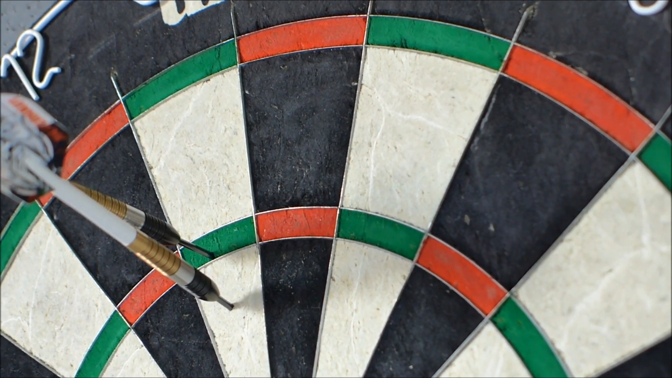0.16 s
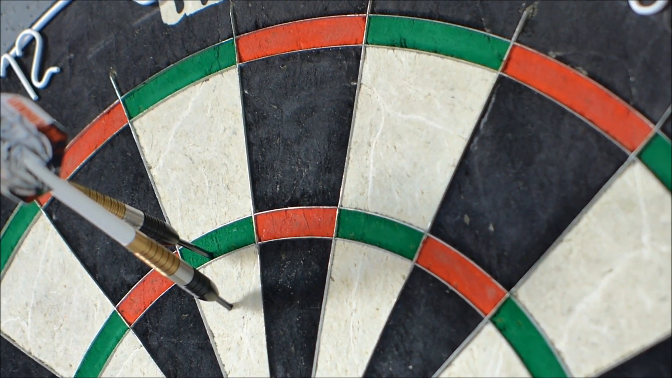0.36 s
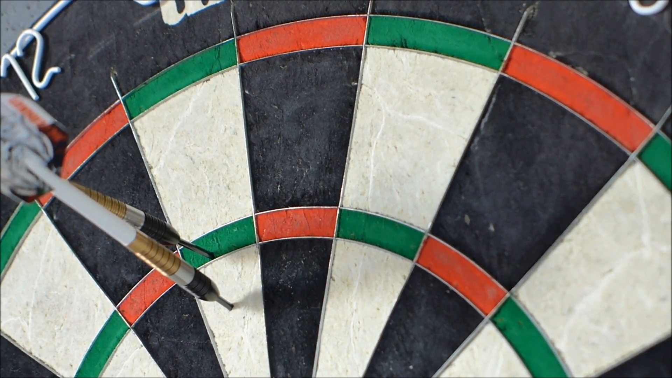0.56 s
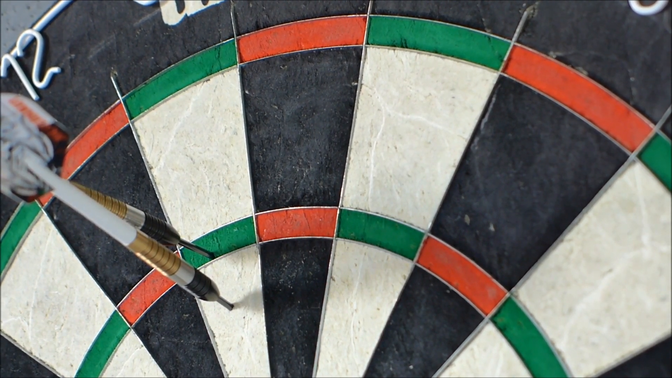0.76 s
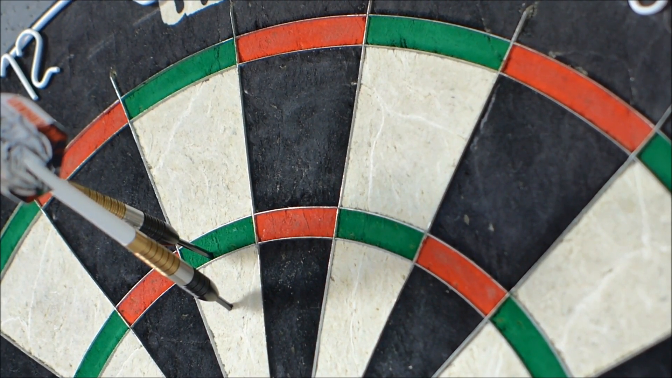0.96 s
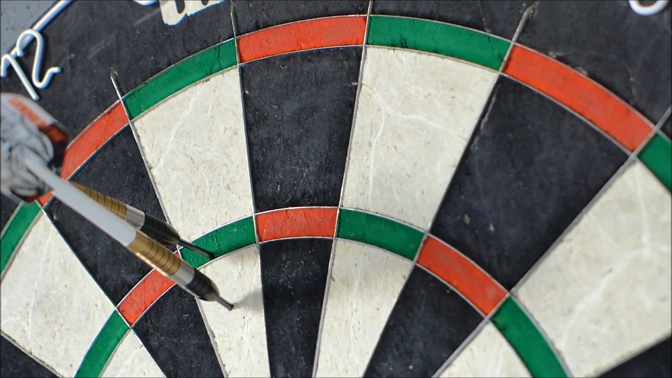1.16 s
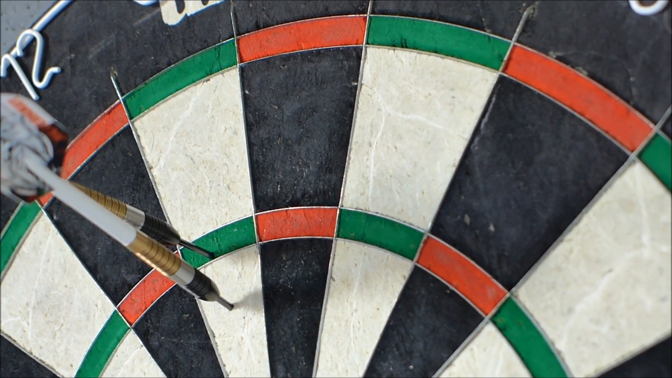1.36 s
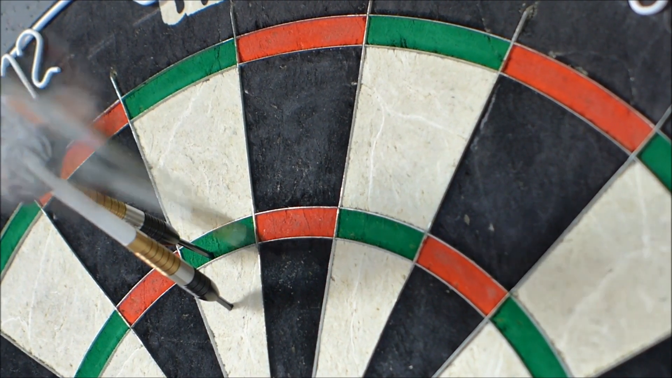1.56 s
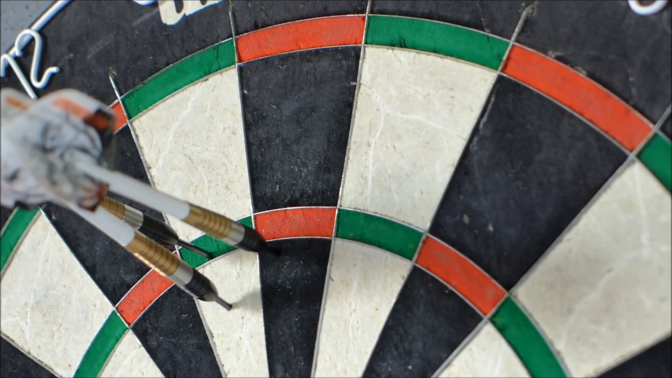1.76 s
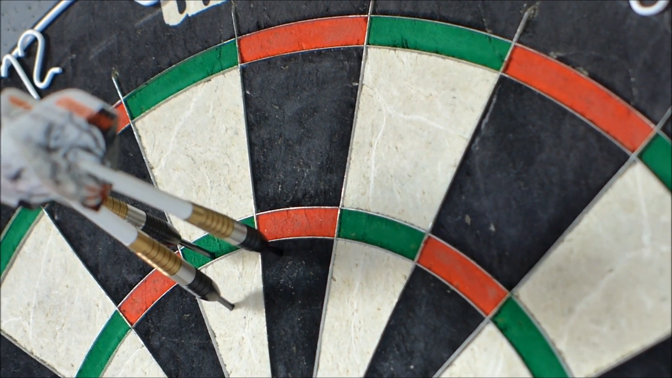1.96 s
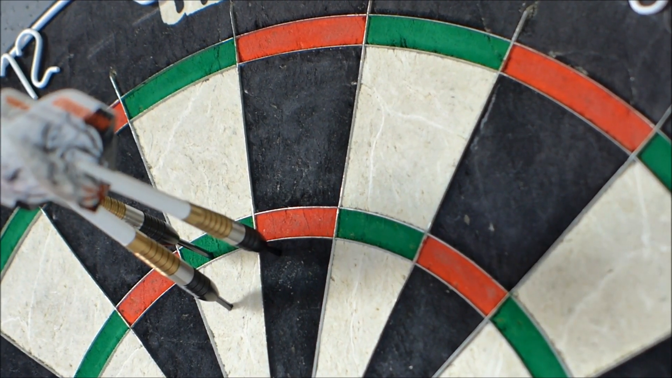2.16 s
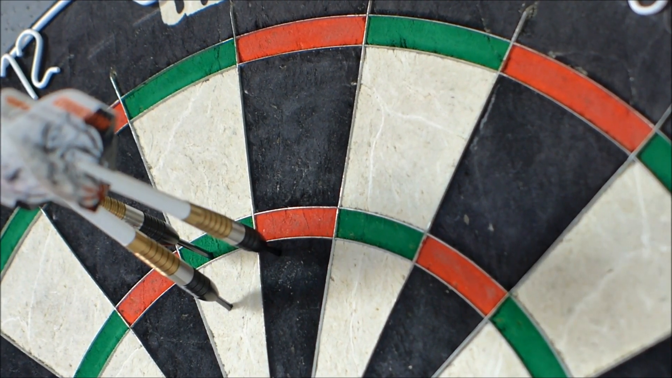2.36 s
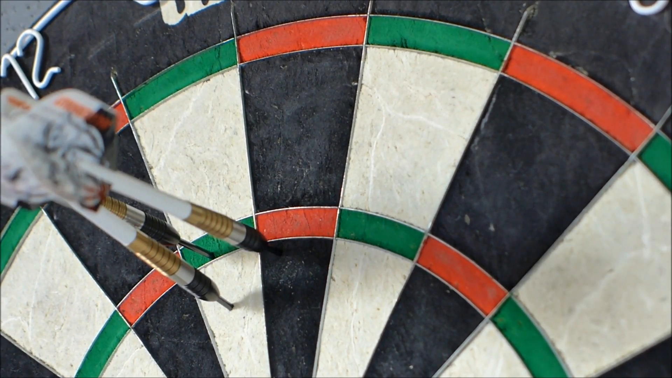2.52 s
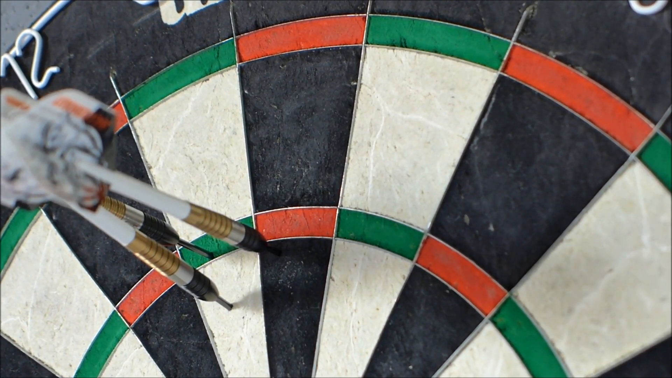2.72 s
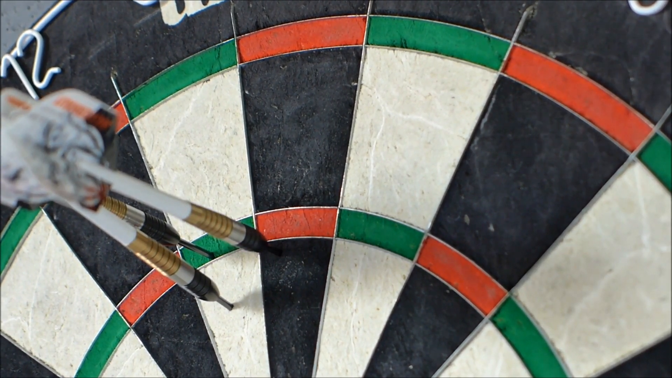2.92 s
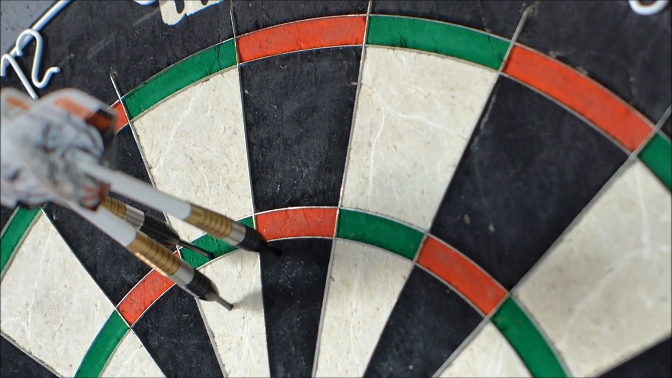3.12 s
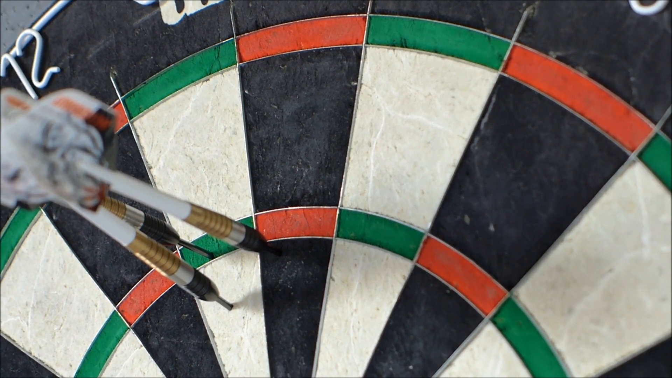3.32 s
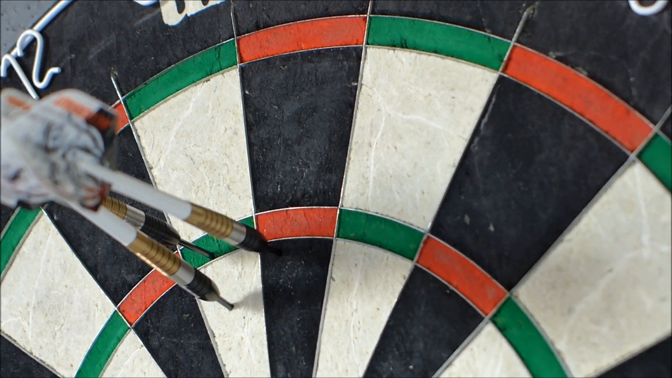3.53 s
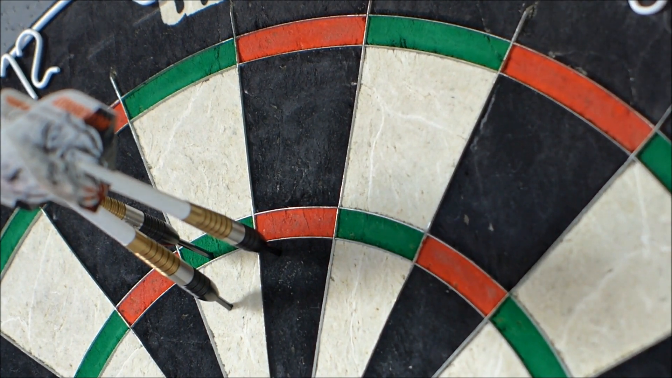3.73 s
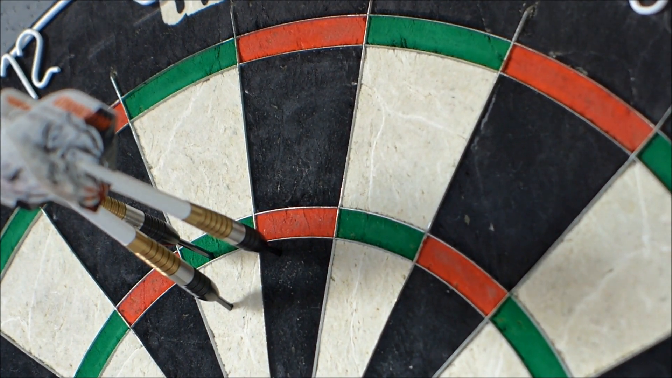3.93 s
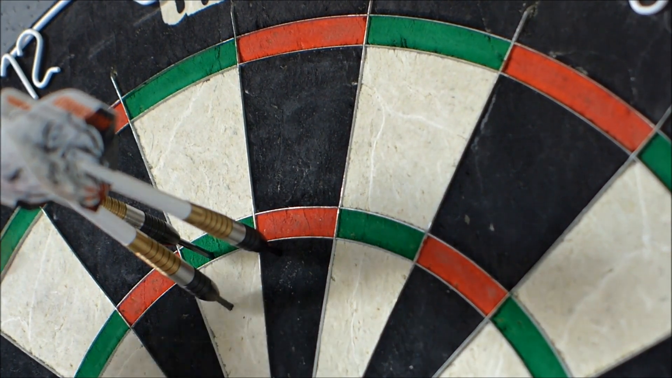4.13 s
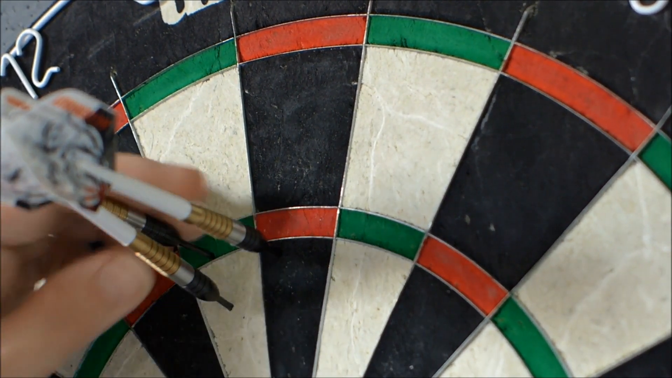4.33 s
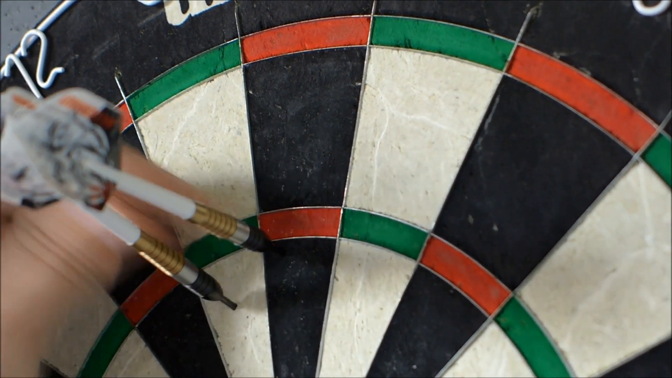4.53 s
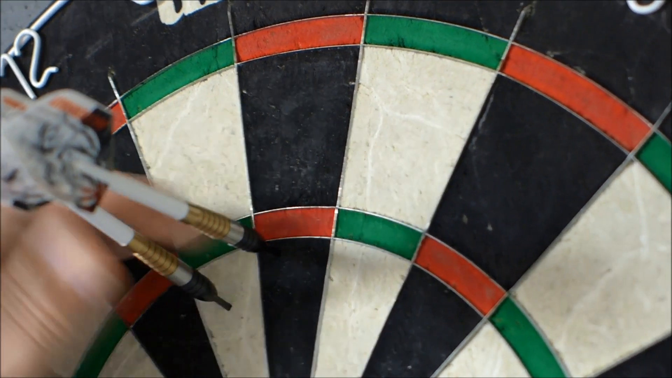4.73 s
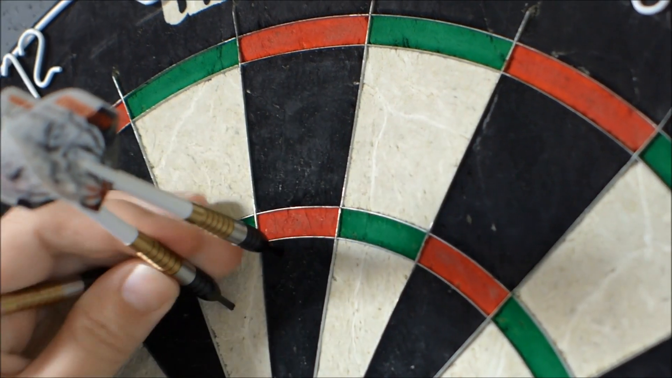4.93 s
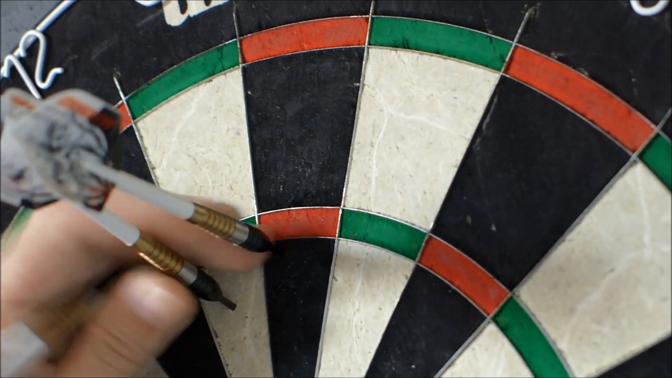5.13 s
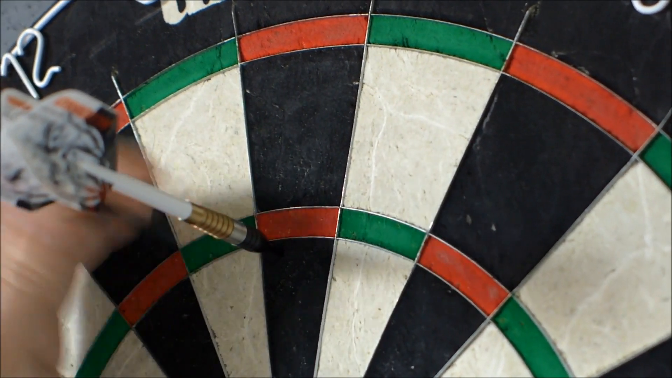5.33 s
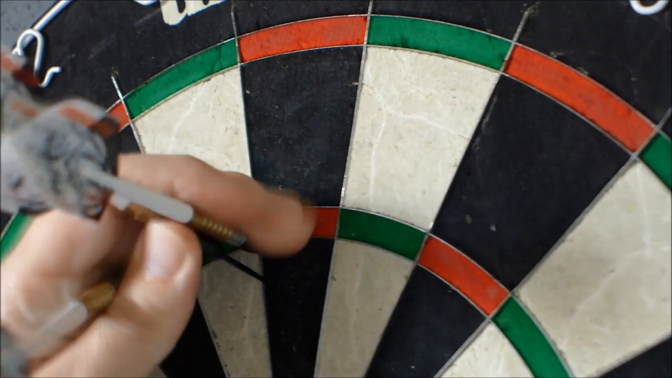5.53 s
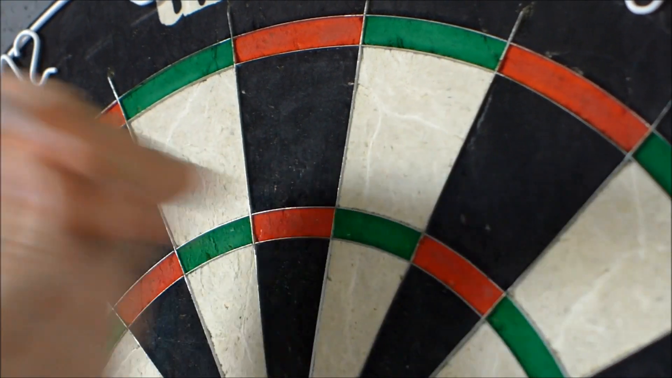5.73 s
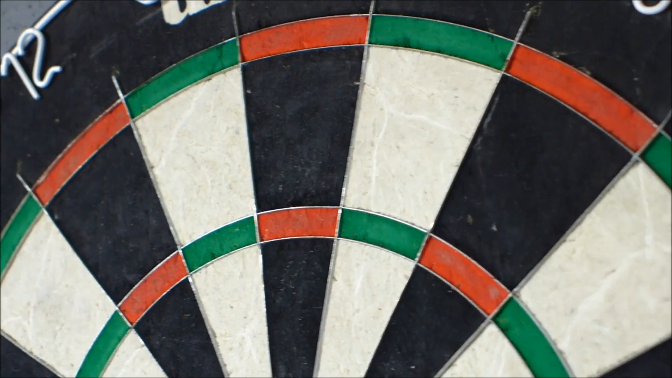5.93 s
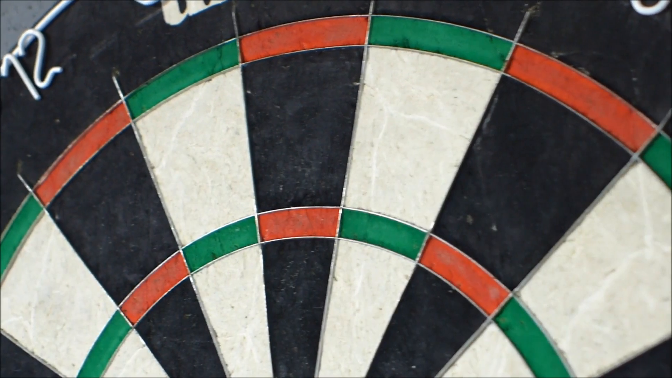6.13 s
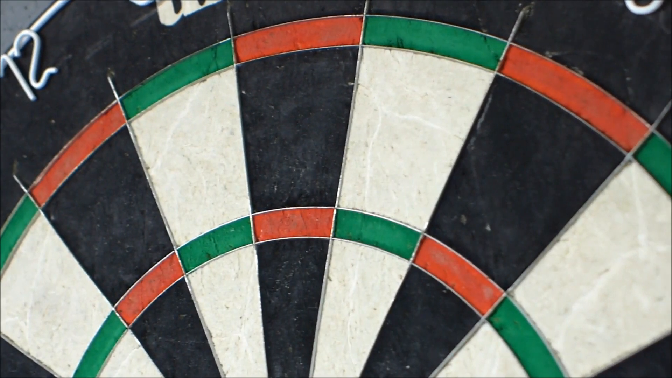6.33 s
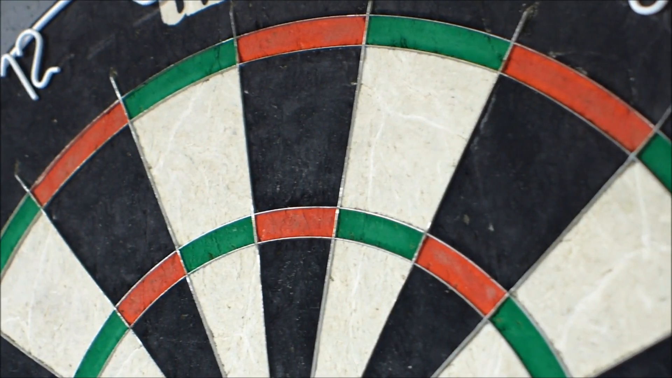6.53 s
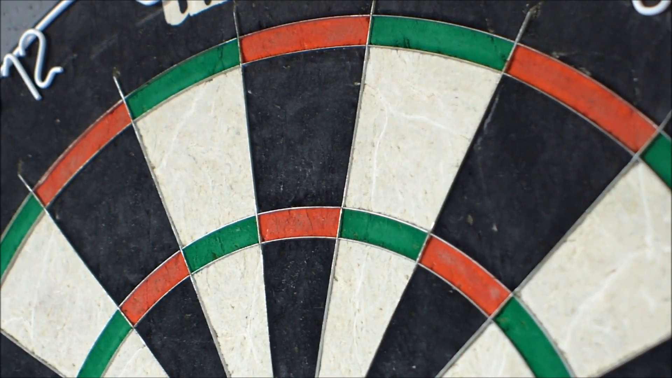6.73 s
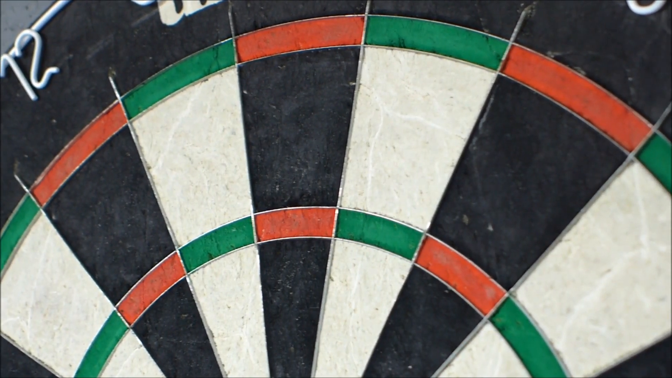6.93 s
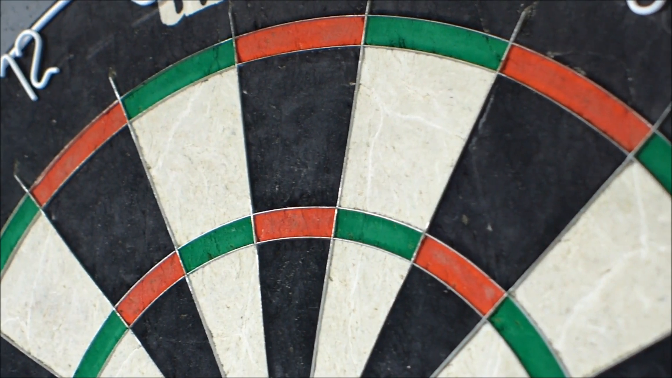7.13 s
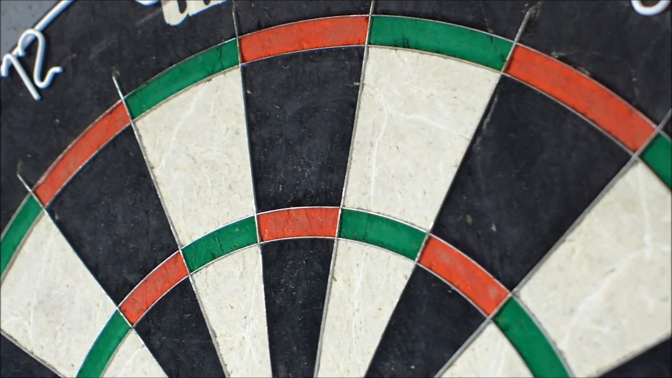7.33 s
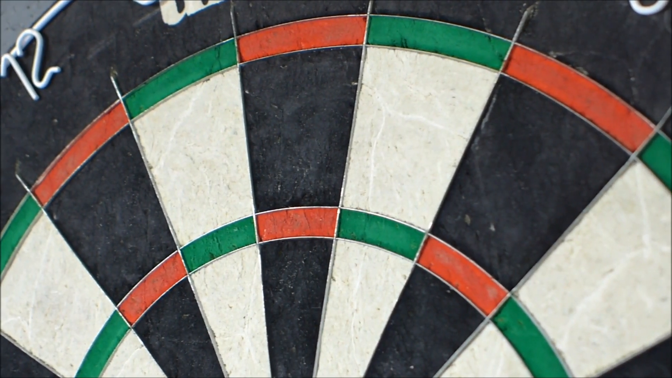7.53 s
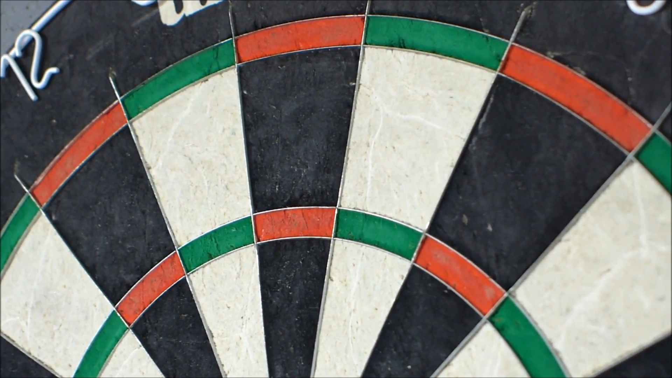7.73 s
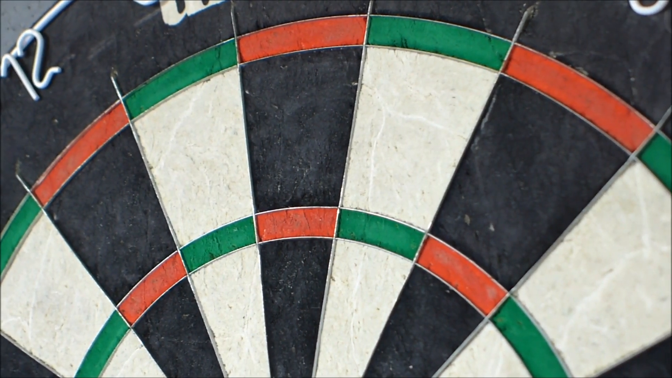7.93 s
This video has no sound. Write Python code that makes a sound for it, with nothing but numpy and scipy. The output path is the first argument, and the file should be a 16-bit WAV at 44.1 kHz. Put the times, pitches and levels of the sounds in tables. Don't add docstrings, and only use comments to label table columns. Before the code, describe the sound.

A quiet small room, faint low hum and soft microphone hiss, with a tiny rustle and shoe touch near 1.2 seconds. At about 1.66 a dart strikes close by: a bright steel tick, at once a heavy, short woody thump of the board on the wall, and a rattle fading within a tenth of a second. Footsteps approach over a hard floor, with a clear heel knock at 2.5, softer ones around 3.3, and a hard shoe edge at 3.9, with light cloth rustle. From 4.5 to 5.4 fingers handle the darts with small metal clicks and dull knocks. Between 5.55 and 5.8 the darts are pulled free in a dense burst of scrapes, snaps and plastic clatter. Steps walk away from 6.1, hollow and roomy, strongest near 6.4, 6.9 and 7.8, over slightly raised hiss. The echoes are short and dry.

```python
import sys
import numpy as np
from scipy import signal
from scipy.fft import rfft, irfft, next_fast_len
from scipy.io import wavfile
from scipy.ndimage import uniform_filter1d, map_coordinates

SR = 44100
rng = np.random.default_rng(int(sys.argv[2]) if len(sys.argv) > 2 else 0)


def persist_wave(psi):
    counts = np.round(np.clip(psi, -1, 1) * 32767).astype(np.int16)
    wavfile.write(sys.argv[1], SR, np.atleast_2d(counts).T)


def field_ratio(decibels):
    return 10 ** (np.asarray(decibels, dtype=float) / 20)


N = 351477
SPAN = 12288
HZ = np.fft.rfftfreq(SPAN, 1 / SR)
FLOOR_WET_DB, HAND_WET_DB = 2.0, 1

# f/Hz, density/dB
HUM_SPECTRUM = [(12, -42), (20, -17), (32, -35.5), (123, -23), (148, -28.5), (167, -16), (240, -17),
                (359, -21), (414, -19.5), (561, -19.5), (659, -20.5), (744, -22.5), (823, -21), (1110, -22),
                (2500, -33.5), (3250, -52), (5500, -120)]
HISS_SPECTRUM = [(880, -9.5), (1500, 4), (2160, -4.5), (2250, -6.5), (2610, -4.5), (3830, -7.5), (4190, -4),
                 (5690, -4.5), (10300, -7.5), (13700, -11.5), (15900, -19.5)]
# t/s, level over the still room/dB
STIR = [(0, 0), (1.5, 2), (2.6, 2.5), (3.6, 3), (4.7, 3.5), (5.3, 4), (5.7, 6.5), (6, 3.5), (7, 5.5),
        (7.6, 3.5), (7.97, 6.5)]
# f/Hz, likeness
AIR_LIKENESS = [(60, 0.83), (180, 0.82), (550, -0.47), (1650, -0.73), (4970, 0.3), (15000, 0.57)]
# f/Hz, likeness
ECHO_LIKENESS = [(100, 0.96), (400, 1), (1000, 0.77), (3000, 0.67), (10000, 0.2)]
# f/Hz, T60/s
ROOM_DECAY = [(100, 0.33), (500, 0.19), (2000, 0.22), (6000, 0.21), (14000, 0.21)]

# t of peak/s, level/dB,
# swell/(dB/s), fade/(dB/s)
SLEEVE_RUSTLES = [(1.212, -62.5, 399, 178), (5.936, -58.5, 120, 217.5), (6.555, -59, 599, 260),
                  (7.942, -61.5, 600, 200), (1.6565, -47.5, 3001.5, 4002), (5.7205, -48, 1200, 3000)]
# t of peak/s, level/dB, swell/(dB/s), fade/(dB/s)
STRIDE_RUSTLES = [(2.05, -80, 150, 100.6), (2.38, -72.5, 100, 100), (2.71, -71, 300, 39.8),
                  (3.1, -81, 40.2, 40.2), (3.55, -70, 30, 40), (5.44, -64, 300, 600), (5.99, -80, 60, 200),
                  (6.4, -67, 100, 150), (6.56, -72, 400, 200), (7.16, -65.5, 500, 75)]
# f/Hz, density/dB
WEAVE_SPECTRUM = [(1760, -40), (3000, -17), (4200, -15), (5000, -2.5), (6090, -15.5), (9000, -16),
                  (14000, -31), (16000, -40)]
SMOOTH_SPECTRUM = [(1500, -29), (3500, -17), (5000, -7.5), (8000, -10.5), (12000, -12.5), (16000, -27)]

# f/Hz, density/dB
FLOOR_SPECTRUM = [(35, -46), (60, -34.5), (156, -9.5), (370, -6), (576, -3.5), (980, -4), (1140, -7),
                  (2600, -12.5), (3470, -15.5), (4050, -11.5), (12000, -31), (15600, -59), (22000, -120)]
# t/s, level/dB, hardness/dB, hollow note f/Hz
TOES = [(1.277, -43, -7, 830), (2.645, -48, -9, 1100), (6.2465, -38.5, -21, 970), (3.918, -45, -7, 2100),
        (7.766, -29.5, -7.5, 560), (7.772, -37, 1, 1100), (2.493, -31, -10, 1060)]
# t/s, level/dB, hardness/dB, hollow note f/Hz
SOLES = [(1.977, -44.5, -13.5, 570), (2.564, -46.5, -11, 456), (3.2345, -42.5, -19, 760),
         (3.33, -33, -15.5, 440), (6.3255, -36.5, -12, 519), (6.355, -34, -4, 705), (6.396, -29, -6, 550),
         (6.414, -48, -11, 571), (6.906, -39, -10, 516), (6.92, -22, -12, 556), (6.991, -35, -18, 530),
         (7.132, -42.5, -14, 560), (7.152, -38, -10, 710), (7.2, -50, -6, 800), (7.937, -30.5, -24.5, 615)]
# t/s, level/dB, hardness/dB, hollow note f/Hz
HEELS = [(2.175, -52, -1, 568), (2.485, -25, -5, 640), (2.658, -39.5, -14, 664), (2.684, -41.5, -14, 465),
         (3.359, -47.5, 0, 735), (3.388, -40.5, -4.5, 523), (4.075, -39, -13.5, 925), (4.127, -49, -2, 450),
         (4.196, -50.5, -9, 460), (6.694, -42.5, -27, 526), (6.842, -39.5, -9, 563), (7.262, -44, -10, 690)]
# t/s, level/dB, hardness/dB, hollow note f/Hz
CREAKS = [
    (2.471, -50, 8, 395),
    (6.124, -47.5, -17.5, 680),
]
# t/s, level/dB, hardness/dB, hollow note f/Hz, contact/s
KNOCKS = [
    (3.933, -26.5, 1, 503, 0.0024),
    (4.569, -47, -5, 400, 0.003),
    (4.884, -34, -25, 680, 0.0037),
    (5.0764, -37.5, 1.5, 750, 0.0047),
    (5.336, -30, 8, 430, 0.0014),
    (5.382, -41.5, -3, 520, 0.0056),
    (5.716, -36, 1, 560, 0.0088),
]
# t/s, level/dB, hardness/dB, hollow note f/Hz, contact/s
RAPS = [(5.2279, -31.5, -17, 780, 0.00084), (5.304, -43, -9, 468, 0.0029), (5.552, -25.5, -4, 840, 0.0033),
        (5.566, -26, -7, 810, 0.0068), (5.623, -30, -7, 1140, 0.0031), (5.775, -34, 5, 614, 0.0021),
        (5.858, -42, 5, 1270, 0.0051), (6.924, -25.5, -10.5, 1000, 0.005)]

# t/s, level/dB
POINT_MODES = [(1790, -5, 0.015), (2760, -16, 0.018), (4510, -7, 0.022), (5740, -9, .02), (6870, -1, 0.014),
               (9200, -9, .011), (10700, -8, 0.016)]
POINT_HITS = [
    (1.6567, -13),
    (1.692, -24),
]
# t/s, level/dB
FACE_MODES = [(216, -8, 0.18), (324, -1, 0.19), (410, -8, 0.18), (473, -3, 0.26), (560, -5, 0.16),
              (633, -6, 0.25), (740, -8.5, 0.17), (915, -3, 0.17)]
FACE_HITS = [
    (1.682, -25),
]
# t/s, level/dB
WIRE_MODES = [(1047, 0, .1), (1340, -2, .03), (1755, -9, .06), (2115, -12, .07), (2420, -15, .07)]
WIRE_HITS = [
    (1.678, -29),
    (1.706, -37),
]
# t/s, level/dB
LANDING_MODES = [(820, 0, .07), (1284, -7.5, 0.12), (1628, -13, 0.13), (1820, -12.5, 0.099),
                 (2180, -11.5, .08), (2830, -18, 0.09)]
LANDING_HITS = [(2.495, -37), (2.556, -50), (2.657, -52), (3.233, -53.5), (4.884, -50), (6.2465, -50.5)]
# t/s, level/dB
EDGE_MODES = [(726, -4, 0.072), (1627, -3, 0.082), (2190, -2, 0.027), (3080, -1, .025), (3920, 0, .025)]
EDGE_HITS = [(3.9355, -37.5), (6.4, -48), (6.945, -49), (6.375, -50)]
# t/s, level/dB
RIM_MODES = [(554, -9.5, 0.17), (840, 0.5, 0.063), (1260, -11, .1), (1693, -10, .078)]
RIM_HITS = [
    (5.552, -28.5),
]

# t/s, level/dB, contact/s
THUMPS = [
    (1.657, -30.5, 0.00044),
    (1.67, -31, .0004),
    (1.6771, -6.5, 0.0004),
    (1.6814, -9, 0.00089),
    (1.692, -18, 0.00043),
    (1.706, -24.5, 0.00045),
]
# f/Hz, width/Hz, level/dB
BOARD_MODES = [(115.6, 50, -12.5), (210, 120, -14), (310, 130, 1), (450, 260, 4), (735, 330, 5),
               (1310, 570, -5)]

# f/Hz, density/dB
DART_SPECTRUM = [(530, -19), (900, -20.5), (1150, -5), (1390, -6.5), (2020, 3), (2600, -6.5), (3150, -12.5),
                 (3700, -7.5), (4680, -5), (5410, -9.5), (9090, -13.5), (13200, -22.5), (14400, -23),
                 (15400, -29.5), (16000, -60)]
# f/Hz, width/Hz, level/dB
BARREL_MODES = [(1900, 122, -4), (2200, 84, -6), (4000, 84, 5), (4960, 91, -23), (5730, 280, 0),
                (7260, 250, 10)]
# t/s, level/dB, top share/dB, left-right/dB
POINT_SNAPS = [
    (1.6574, -6.5, 1, 3.5),
    (1.6597, -13, -11.5, -6.5),
    (5.6145, -28, -4, 6),
]
# t/s, level/dB, top share/dB, left-right/dB
RATTLES = [(1.6695, -21, -11, -5), (1.6855, -29.5, -21, -3), (1.6915, -16, 7, -5), (1.7024, -27.5, -14, -5),
           (1.7161, -24, -8, -2), (1.7355, -48, -7, -6), (1.7553, -33.5, -7.5, -3)]
# t/s, level/dB, top share/dB, left-right/dB
CLICKS = [(2.387, -54, -1.5, -0.5), (3.3293, -45.5, -7.5, -.5), (3.627, -47.5, 1.5, 0),
          (4.566, -42.5, -6, -3), (4.637, -45, -5.5, -3.5), (4.8799, -35.5, 10.5, 1.5),
          (4.8844, -42.5, -34, -7), (4.9611, -39, 7, -1), (5.0674, -40.5, -11, -3), (5.0771, -27, -7.5, -5),
          (5.1944, -43.5, -6, -.5), (5.3314, -44, -8, -6), (5.3394, -25, -11.5, -12), (5.7365, -27, 4, 3),
          (5.8018, -31.5, -1, 5), (5.9873, -37, 3, 5), (6.215, -45.5, 10, -6), (6.3555, -45, -14, -7),
          (6.4153, -38, -11, -6)]
# t/s, level/dB, top share/dB, left-right/dB
SHAFTS = [(2.696, -46, -25, 5), (5.227, -41.5, -23, 0), (5.456, -41.5, -29, .5), (5.7807, -25.5, -25, 0),
          (5.9305, -38, -23, 5), (5.954, -40, -21, 5)]
# t/s, level/dB, top share/dB, left-right/dB
TAPS = [
    (3.9324, -25, -65, -8),
    (5.8647, -48.5, -18, -1),
]
# t/s, level/dB, barrel share/dB, top share/dB, contact/s
PULLS = [(5.5526, -28, -52, -22, 0.0022), (5.615, -23.5, -1, 0, 0.0025), (5.6235, -11, -11, -5, 0.0017),
         (5.6338, -23.5, -24, -16, 0.01), (5.713, -18.5, -9, -5, 0.0058), (5.7218, -16, -15, -14, 0.0014)]
# t/s, level/dB, barrel share/dB, top share/dB, contact/s
TICKS = [(1.6728, -25, -16, -2, .0008), (1.6905, -17, -16, 8, .0002), (1.7153, -30, -12, 4, .0003),
         (5.6141, -16, -12, 2, .0002), (5.6219, -15, -14, 5, .0002), (5.6272, -13, -6.5, -7.5, .0012),
         (5.7283, -18, -9, -3, 0.0016), (5.7352, -19, -12, 8, .0002), (5.787, -41, -18, 3, .001),
         (5.793, -45, -14, 0, .0012), (5.801, -23, -12, 8, 0.00018), (3.937, -33, 8, -25, .001),
         (3.942, -34, 10, -20, .0008), (3.949, -36, 11, -22, .001), (3.957, -39, 10, -24, .001),
         (5.562, -36, -6, -16, .004), (5.637, -23, -7, -10, .0006), (5.7167, -21.5, -11, -6, 0.00055),
         (5.7224, -14.5, -7, -8, 0.00046), (6.365, -46, 10, -15, .002), (6.995, -48, 10, -20, 0.0017)]

# t/s, f/Hz, level/dB, T60/s
LOOSE_DARTS = [(1.6686, 5430, -28, .03), (1.692, 10000, -13, 0.0086), (1.716, 4650, -28, 0.027),
               (4.8805, 4930, -40.5, .03), (4.9615, 4980, -42, .02), (5.081, 4520, -40, 0.056),
               (5.089, 5030, -41, .04), (5.347, 4830, -39, .03), (5.355, 4200, -40, 0.047),
               (5.553, 6070, -30, 0.022), (5.628, 4870, -24, 0.08), (5.632, 6070, -24.5, .07),
               (5.722, 4650, -14, 0.023), (5.729, 8300, -26, .012), (5.7807, 5000, -32, 0.049),
               (5.802, 4420, -29, 0.023), (5.801, 9540, -24, 0.01), (5.624, 1103, -27.5, 0.078),
               (1.662, 1150, -34, .06), (1.7255, 1310, -44, 0.064), (1.704, 5900, -33, .04),
               (1.6855, 4900, -23, 0.016)]
# t/s, f/Hz, level/dB, T60/s
PLANKS = [(1.678, 290, -21, 0.04), (1.69, 393, -23, 0.045), (5.236, 1020, -47, 0.035), (5.7, 800, -48, .04),
          (5.3, 780, -42, .02), (5.557, 930, -39, .08), (2.658, 735, -41, 0.036), (6.93, 850, -30, 0.037),
          (2.498, 480, -37, .06), (2.521, 870, -36, 0.074), (3.942, 236, -35, 0.08),
          (3.936, 1400, -35, .06), (3.936, 2520, -33, 0.022), (6.356, 630, -32, 0.03),
          (6.363, 1260, -34, 0.03), (6.418, 530, -34, .04), (6.939, 620, -25, 0.037),
          (6.9915, 590, -26, 0.027), (7.696, 780, -44, 0.014), (6.3965, 550, -28.5, .03),
          (3.234, 660, -41, 0.04), (2.507, 2900, -44, .03), (2.565, 1900, -47, 0.036),
          (3.36, 1400, -48, .05), (7.836, 720, -44, .04), (7.766, 668, -23, 0.031),
          (7.781, 850, -32.5, .05), (7.768, 1340, -33, 0.043), (7.944, 520, -34, 0.022),
          (4.36, 430, -56.5, 0.13), (4.405, 423, -54, .1)]
# t/s, f/Hz, level/dB, T60/s
TOUCHED_PARTS = [(4.073, 1010, -47, 0.12), (4.371, 1290, -59, 0.17), (5.077, 2200, -26, 0.013),
                 (5.229, 2890, -60, 0.2), (5.339, 2200, -26.5, 0.021), (5.624, 1900, -26, 0.028),
                 (5.722, 1730, -27, 0.058), (5.734, 4140, -35, 0.094), (1.756, 5330, -34, .02),
                 (5.396, 525, -43, 0.093)]
# t/s, f/Hz, level/dB, T60/s
NAILS = [(3.937, 4000, -35, .02), (3.936, 2250, -34, .02), (3.957, 1600, -42, .06),
         (6.402, 2600, -42, .025), (6.399, 4050, -46, .025), (6.42, 1600, -43, .05),
         (6.362, 2500, -47, .05), (6.924, 2700, -39, .035), (6.922, 4800, -45, .03),
         (6.948, 1000, -35, .04), (6.96, 1500, -44, .05), (6.334, 1300, -46, .03)]
# t/s, level/dB
WEIGHT = [(2.491, -40), (2.693, -52), (3.242, -50), (3.36, -46.5), (4.091, -49), (5.72, -54), (6.125, -45),
          (6.254, -48), (6.362, -45), (6.689, -58), (6.86, -46), (6.921, -38), (7.149, -46), (7.262, -46.5),
          (7.78, -62)]
# f/Hz, width/Hz, level/dB
JOIST_MODES = [(36, 28, -6), (64.6, 44, -20), (104, 74, 6.5), (173, 180, 8.5)]


def unit(x):
    return x / np.sqrt(np.mean(x ** 2) + 1e-20)


def along(points, hz):
    f, value = np.transpose(points)
    return np.interp(np.log(hz + 1), np.log(f + 1), value)


def causal(db):
    cepstrum = irfft(np.log(field_ratio(db) + 1e-6))
    cepstrum[1:SPAN // 2] *= 2
    cepstrum[SPAN // 2 + 1:] = 0
    return np.exp(rfft(cepstrum))


def band(spectrum, edges, shares_db):
    db = along(spectrum, HZ)
    bend = []
    for lo, hi, share_db in zip(edges, edges[1:], shares_db):
        inside = (HZ >= lo) & (HZ < hi)
        held_db = 10 * np.log10(np.sum(field_ratio(2 * db[inside])))
        bend.append((np.sqrt(lo * hi), share_db - held_db))
    return causal(db + along(bend, HZ))


def ringing(modes):
    total = 0
    for k, (centre, width, db) in enumerate(modes):
        damping = 1j * HZ * width
        total = total + (-1) ** k * field_ratio(db) * damping / (centre ** 2 - HZ ** 2 + damping)
    return total


def note(hz, db, t60, rise_s):
    t = np.arange(SPAN) / SR
    envelope = field_ratio(db - 60 * t / t60) * (1 - np.exp(-t / rise_s))
    return envelope * np.sin(2 * np.pi * hz * t)


def contact(colour, touch_s, blow, blow_s, rough_db):
    t = np.arange(SPAN) / SR
    u = t / touch_s
    lumps = field_ratio(rough_db * np.repeat(rng.standard_normal(SPAN // 32), 32))
    rough = rng.standard_normal(SPAN) * lumps * u * np.exp(-u)
    push = t * np.exp(-t / blow_s)
    force = rough + blow * np.linalg.norm(rough) * push / push.sum()
    sound = irfft(rfft(force) * colour, SPAN)
    return sound / np.abs(sound).max()


def reverberation(gap_s):
    hz = HZ[::SPAN // 256]
    t = np.arange(SPAN // 128 + 1) * 128 / SR
    z = rng.standard_normal((2, len(hz), len(t), 2)) @ [1, 1j]
    z = z * field_ratio(-60 * t / along(ROOM_DECAY, hz)[:, None])
    turn = np.arccos(np.clip(along(ECHO_LIKENESS, hz), -1, 1))[:, None] / 2
    mid, side = z[0] * np.cos(turn), z[1] * np.sin(turn)
    window = signal.get_window("hann", 256)
    frames = irfft(np.array([mid + side, mid - side]).transpose(0, 2, 1)) * window
    overlap = frames[:, :-1, 128:] + frames[:, 1:, :128]
    tail = (overlap / (window[128:] ** 2 + window[:128] ** 2)).reshape(2, SPAN)
    sample = np.arange(SPAN)
    build_up = 1 - np.exp(-(sample / SR / gap_s) ** 2)
    echoes_db = map_coordinates(rng.standard_normal(SPAN // 128 + 2), [sample / 128], order=1)
    return tail * build_up * field_ratio(0.58 * echoes_db)


def add(out, s, sound, colour, pan_db, wet_db, gap_s):
    wet = irfft(rfft(reverberation(gap_s)) * colour, SPAN)
    wet = wet * np.linalg.norm(sound) / np.linalg.norm(wet) * np.sqrt(2)
    direct = sound * field_ratio([[pan_db / 2], [-pan_db / 2]])
    start = round(s * SR)
    out[:, start:start + SPAN] += direct + field_ratio(wet_db) * wet


def rush(spectrum, patchy_db):
    z = signal.stft(rng.standard_normal((2, N + 8192)), nperseg=512)[2]
    field = uniform_filter1d(rng.standard_normal(z.shape[1:]), size=6, axis=0)
    field = uniform_filter1d(field, size=14, axis=1)
    pair = signal.istft(z * field_ratio(patchy_db * unit(field)), nperseg=512)[1]
    m = next_fast_len(pair.shape[1])
    hz = np.fft.rfftfreq(m, 1 / SR)
    turn = np.arccos(np.clip(along(AIR_LIKENESS, hz), -1, 1)) / 2
    gain = field_ratio(along(spectrum, hz)) * (hz < 15750)
    mid, side = irfft(rfft(pair, m) * gain * [np.cos(turn), np.sin(turn)], m)[:, :N]
    return unit(np.array([mid + side, mid - side]))


def air():
    stir_db = np.interp(np.arange(N) / SR, *np.transpose(STIR))
    hum = field_ratio(-60 + 0.95 * stir_db) * rush(HUM_SPECTRUM, patchy_db=1.9)
    hiss = field_ratio(-64 + 1.02 * stir_db) * rush(HISS_SPECTRUM, patchy_db=0.64)
    return hum + hiss


def swells(rows):
    t = np.arange(N) / SR
    return sum(field_ratio(db - np.maximum(swell * (s - t), fade * (t - s))) for s, db, swell, fade in rows)


def cloth():
    sleeve = swells(SLEEVE_RUSTLES) * rush(WEAVE_SPECTRUM, patchy_db=1.0)
    strides = swells(STRIDE_RUSTLES) * rush(SMOOTH_SPECTRUM, patchy_db=2.0)
    return field_ratio(9.5) * (sleeve + strides)


def steps(out):
    # table, bass share/dB, contact/s
    shoes = ((HEELS, -1, 0.0046), (SOLES, -10, 0.0081), (TOES, -28, 0.0034), (CREAKS, 8.8, 0.0042))
    rows = [(*row, touch_s, bass_db, FLOOR_WET_DB) for table, bass_db, touch_s in shoes for row in table]
    rows += [(*row, -1, FLOOR_WET_DB) for row in KNOCKS]
    rows += [(*row, -9, HAND_WET_DB) for row in RAPS]
    for s, db, hard_db, note_hz, touch_s, bass_db, wet_db in rows:
        shares_db = (bass_db + 3.0, 0, hard_db - 0.5, hard_db - 11.0)
        colour = band(FLOOR_SPECTRUM, (170, 350, 1200, 4000, 9000), shares_db)
        colour = colour * (1j * HZ / (110 + 1j * HZ)) ** 2
        hollow = ringing([(note_hz, 0.25 * note_hz, 8)])
        knock = contact(colour * (1 + hollow), touch_s, blow=0.76, blow_s=0.00013, rough_db=3.5)
        echo = colour * (1 + 0.26 * hollow)
        add(out, s - 0.0008, field_ratio(db - 0.5) * knock, echo, pan_db=-0.5, wet_db=wet_db, gap_s=0.0034)


def chords(out, modes, hits, rise_s, wet_db):
    sound = sum(note(*mode, rise_s) for mode in modes)
    for s, db in hits:
        add(out, s, field_ratio(db) * sound, rfft(sound), pan_db=0.2, wet_db=wet_db, gap_s=0.0071)


def thump(out):
    t = np.arange(SPAN) / SR
    small_board = (1j * HZ / (75 + 1j * HZ)) ** 2
    for s, db, touch_s in THUMPS:
        push = t * np.exp(-t / touch_s)
        colour = rfft(push) * ringing(BOARD_MODES) * small_board
        ring = irfft(colour, SPAN)
        sound = -field_ratio(db) * ring / np.abs(ring).max()
        echo = colour * 1j * HZ / (260 + 1j * HZ)
        add(out, s, sound, echo, pan_db=0.5, wet_db=-8.0, gap_s=0.0016)


def dart_touches():
    # table, barrel share/dB, contact/s, clean blow
    kinds = ((POINT_SNAPS, -11, 0.00039, 0.78), (RATTLES, -15.5, 0.00091, 0.63), (CLICKS, -10, 0.0016, 0.55),
             (SHAFTS, -25, 0.001, 0.35), (TAPS, 13.5, 0.001, 0.16))
    rows = []
    for table, barrel_db, touch_s, blow in kinds:
        rows += [(s, db, barrel_db, top_db, touch_s, pan_db, blow) for s, db, top_db, pan_db in table]
    rows += [(*row, -4.5, 0.03) for row in PULLS]
    return rows + [(*row, -1, 0.59) for row in TICKS]


def tick(out):
    dull = 1 / (1 + 1j * HZ / 6000)
    for s, db, barrel_db, top_db, touch_s, pan_db, blow in dart_touches():
        colour = band(DART_SPECTRUM, (1200, 3300, 8000, 15500), (barrel_db, 0, top_db))
        struck = [(hz, width, level + rng.normal(0, 3)) for hz, width, level in BARREL_MODES]
        ring = colour * (1 + 0.11 * ringing(struck))
        sound = field_ratio(db + 0.5) * contact(ring, touch_s, blow, blow_s=0.00002, rough_db=2.0)
        echo = (colour + 0.3 * ring) * dull
        add(out, s - 0.0003, sound, echo, np.clip(pan_db, -6, 6), wet_db=-4.0, gap_s=0.0012)


def pings(out, rows, rise_s, pan_db, wet_db):
    for s, hz, db, t60 in rows:
        sound = note(hz, db, t60, rise_s)
        add(out, s, sound, rfft(sound), pan_db, wet_db, gap_s=0.0063)


def weight(out):
    colour = ringing(JOIST_MODES) / (1 + 1j * HZ / 250) ** 2
    for s, db in WEIGHT:
        thud = contact(colour, touch_s=0.0042, blow=0.2, blow_s=0.0026, rough_db=-0.5)
        add(out, s - 0.005, field_ratio(db + 0.5) * thud, colour, pan_db=0.0, wet_db=-0.5, gap_s=0.01)


def scene():
    out = np.zeros((2, N + SPAN))
    bed = air() + cloth()
    steps(out)
    chords(out, POINT_MODES, POINT_HITS, rise_s=0.00027, wet_db=-25.0)
    chords(out, FACE_MODES, FACE_HITS, rise_s=0.0064, wet_db=-17)
    struck = ((WIRE_MODES, WIRE_HITS), (LANDING_MODES, LANDING_HITS), (EDGE_MODES, EDGE_HITS), (RIM_MODES, RIM_HITS))
    for modes, hits in struck:
        chords(out, modes, hits, rise_s=0.00053, wet_db=-3.5)
    thump(out)
    tick(out)
    pings(out, LOOSE_DARTS, rise_s=0.00035, pan_db=-0.5, wet_db=-14.0)
    pings(out, PLANKS, rise_s=0.0012, pan_db=-0.8, wet_db=-8.0)
    pings(out, TOUCHED_PARTS, rise_s=0.00031, pan_db=-4.0, wet_db=-21.0)
    pings(out, NAILS, rise_s=0.0008, pan_db=-0.5, wet_db=-4.0)
    weight(out)
    return out[:, :N] + bed


def band_limit(x):
    return signal.sosfilt(signal.butter(12, 16640, fs=SR, output="sos"), x)


def record(dry):
    mix = dry - 0.003
    return band_limit(mix)


dry = scene()
out = record(dry)
persist_wave(out)
```